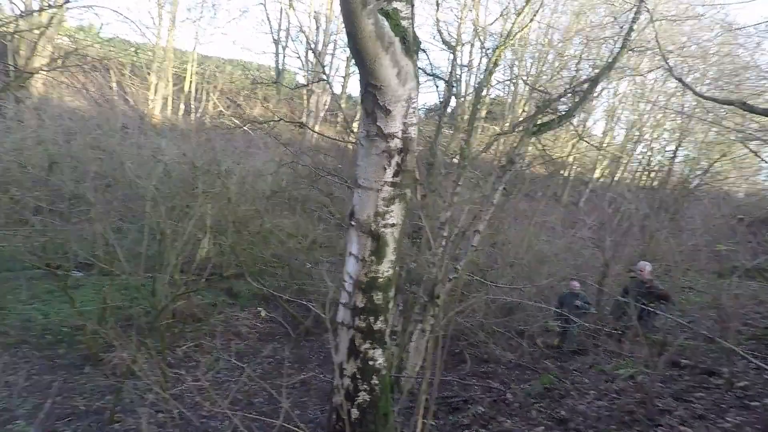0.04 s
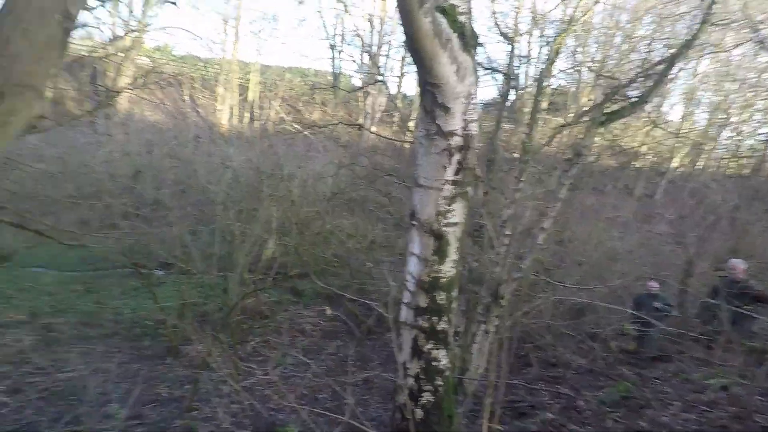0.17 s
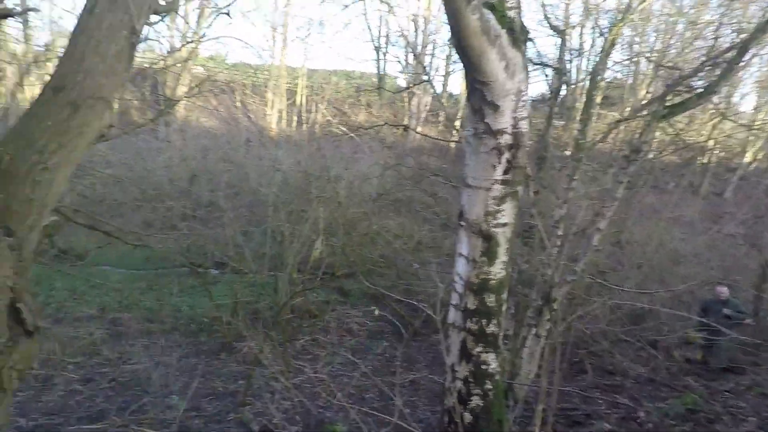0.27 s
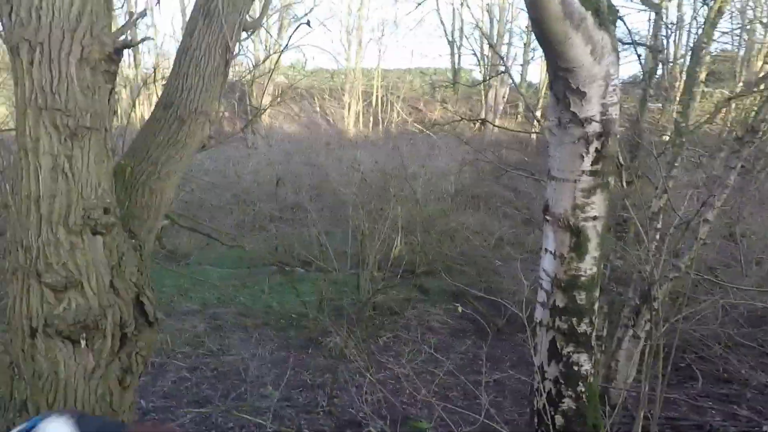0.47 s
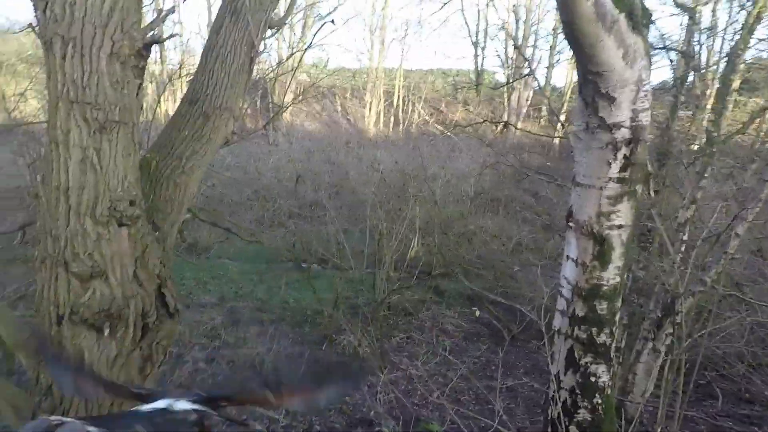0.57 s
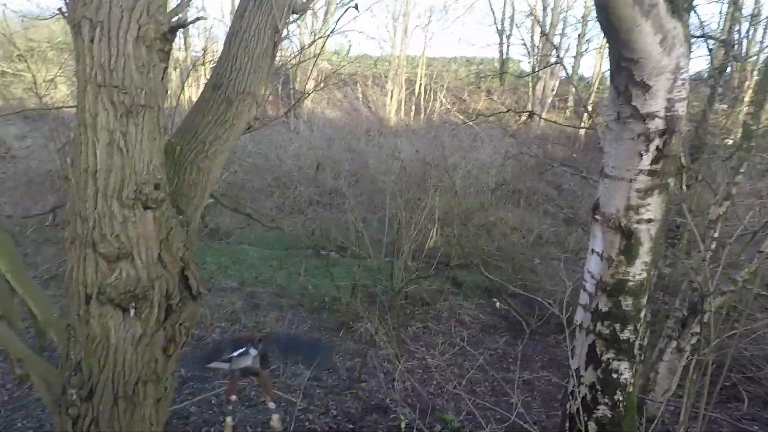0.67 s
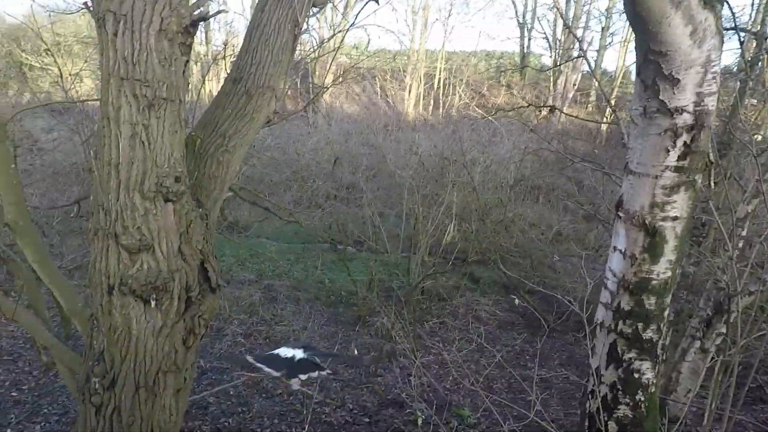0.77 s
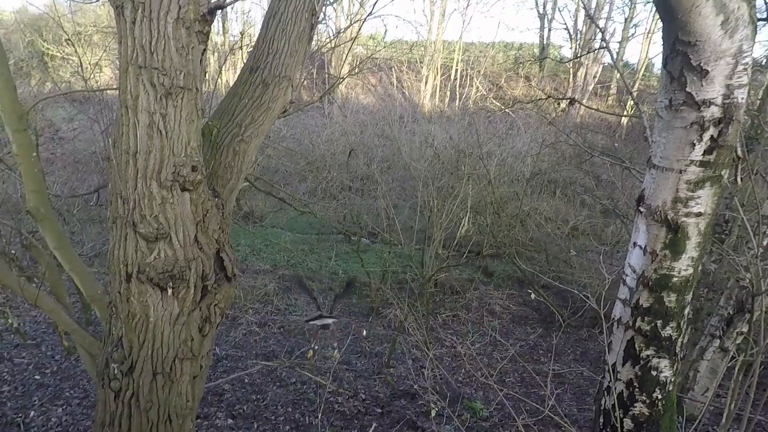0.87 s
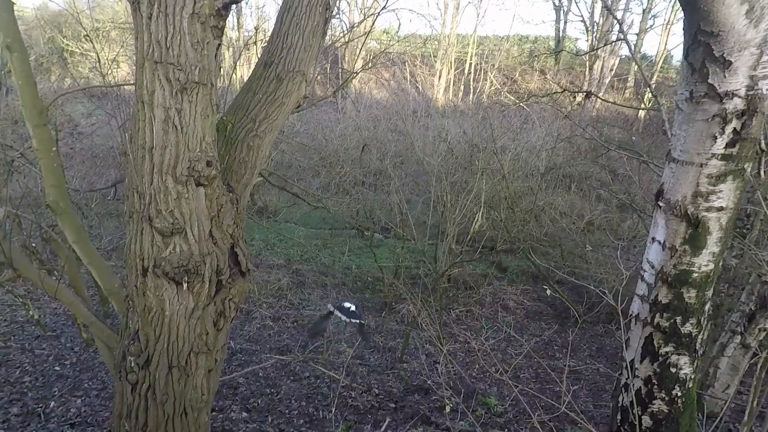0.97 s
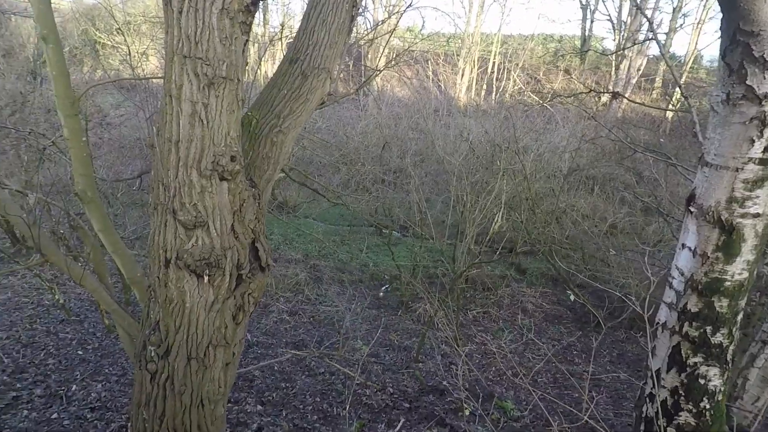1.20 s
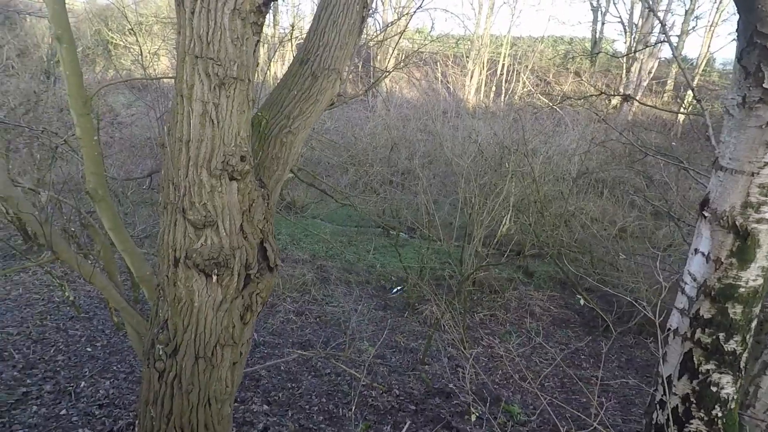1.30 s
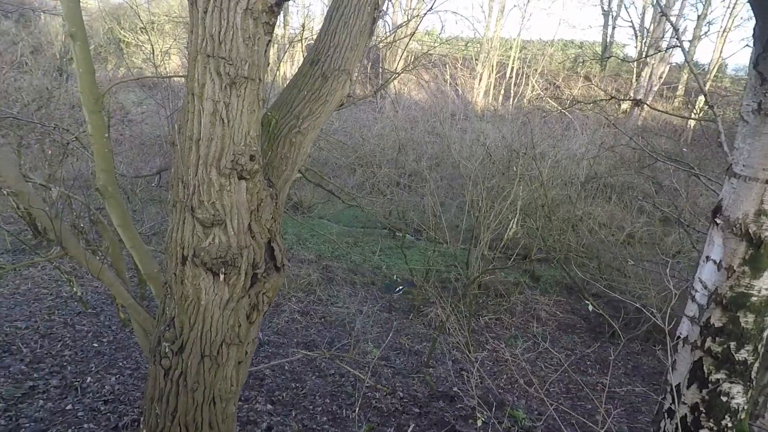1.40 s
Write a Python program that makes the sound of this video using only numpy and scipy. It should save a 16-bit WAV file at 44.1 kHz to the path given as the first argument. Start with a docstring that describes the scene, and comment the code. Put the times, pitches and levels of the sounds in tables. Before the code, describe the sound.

Small bells jingle as a bird takes off close by with a whoosh and a knock.

```python
"""A bird of prey wearing two small bells takes off beside a camera in a winter wood.
First a faint far whistle over hiss. Wings whoosh and low wind rises; near 0.25 s the push-off knocks
the camera mount, which rings, and the hiss dips. From 0.3 s the bird flaps away in puffs of air; its
bells jingle, sink slightly in pitch and echo off the trees. From 0.9 s come brief rustles and two
noisy clapper clicks, while the hiss slowly comes back and the image narrows to mono."""
import sys
import numpy as np
from scipy import signal
from scipy.fft import rfft, irfft
from scipy.io import wavfile
from scipy.ndimage import uniform_filter1d

SR = 44100
rng = np.random.default_rng(int(sys.argv[2]) if len(sys.argv) > 2 else 0)


def int16_out(signal):
    """Quantize to a 16-bit WAV file."""
    q = np.round(np.clip(np.atleast_2d(signal).T, -1, 1) * 32767)
    wavfile.write(sys.argv[1], SR, q.astype(np.int16))


N = 63945
T = np.arange(N) / SR

# Stereo likeness of noises. Each row: frequency in Hz, left-right correlation.
NOISE_CORRELATION = [(60, 0), (200, 0.23), (350, 0.1), (700, -0.43), (1400, -0.56), (2500, 0.07),
                     (16000, -0.4)]
# Share of the bells sent to the trees. Each row: time in seconds, gain in dB.
ECHO_SEND = [(.3, -24), (.75, -9), (1.0, -12.5), (1.45, -9.5)]


def amp(db):
    """Decibels to gain."""
    return 10 ** (np.asarray(db) / 20)


def unit_rms(x):
    """Scales to rms 1."""
    return x / np.sqrt(np.mean(x ** 2) + 1e-20)


def envelope(points):
    """Gain per sample from rows of seconds, dB."""
    return amp(np.interp(T, *np.transpose(points)))


def log_interp(points, hz):
    """Interpolates rows of Hz, value over log frequency."""
    f, value = np.transpose(points)
    return np.interp(np.log(hz + 1), np.log(f + 1), value)


def add(mix, start_s, sound):
    """Mixes a sound in at start_s."""
    part = mix[:, round(start_s * SR):][:, :sound.shape[-1]]
    part += sound[..., :part.shape[1]]


def noise(spectrum, correlation):
    """Stereo noise at rms 1 with the given colour and left-right correlation."""
    hz = np.fft.rfftfreq(N, 1 / SR)
    left, other = rfft(rng.standard_normal((2, N)))
    c = np.clip(log_interp(correlation, hz) if np.ndim(correlation) else correlation, -1, 1)
    right = c * left + np.sqrt(1 - c ** 2) * other
    return unit_rms(irfft(np.array([left, right]) * amp(log_interp(spectrum, hz)), N))


def flicker(rms_db=2.35, smooth_s=0.018):
    """Quick random changes of gain."""
    return amp(rms_db * unit_rms(uniform_filter1d(rng.standard_normal(N), int(smooth_s * SR))))


def bursts(times_s, levels_db, decay_s):
    """Envelope of sudden onsets with exponential decay."""
    kicks = np.zeros(N)
    kicks[np.round(times_s * SR).astype(int) % N] = amp(levels_db)
    return signal.lfilter([1], [1, -np.exp(-1 / (decay_s * SR))], kicks + 1e-12)


def whistle():
    """A thin wavering note far off, like a small songbird."""
    # Each row: time in seconds, pitch in Hz, level in dB.
    contour = [(0, 7300, -66), (.04, 7150, -55), (.08, 6750, -60), (.125, 6550, -58), (0.166, 7150, -58),
               (.185, 7100, -75)]
    times_s, hz, db = np.transpose(contour)
    waver_hz = 35 * unit_rms(uniform_filter1d(rng.standard_normal((2, N)), size=130))
    phase = 2 * np.pi * np.cumsum(np.interp(T, times_s, hz) + waver_hz, axis=1) / SR
    return amp(np.interp(T, times_s, db, right=-140)) * np.sin(phase)


def wind_and_hiss():
    """Wind on the microphone; background hiss dips after the thump, then slowly comes back."""
    # Spectra. Each row: frequency in Hz, relative level in dB.
    wind_spectrum = [(10, -10), (27, 0.5), (45, -1), (75, -5.5), (110, -17), (200, -25), (500, -40.5),
                     (16000, -100)]
    early_spectrum = [(30, -36), (100, -53), (130, -7), (160, 1.5), (220, -5), (700, -12), (1100, -14),
                      (2400, -25), (3800, -29.5), (5700, -30.5), (7200, -23.5), (9000, -27.5),
                      (12600, -35.5), (16000, -48)]
    late_spectrum = [(40, 0.5), (150, -0.5), (300, -3.5), (700, -8), (1500, -15.5), (3500, -15),
                     (5000, -19), (7500, -21.5), (10000, -24), (14000, -31.5), (16000, -40)]
    # Envelopes. Each row: time in seconds, level in dB.
    wind_levels = [(0, -86), (.2, -68), (.27, -34.5), (.5, -43), (.65, -39.5), (.88, -40), (1.0, -56.5),
                   (1.1, -48), (1.2, -37), (1.45, -35)]
    early_levels = [(0, -48), (.2, -46.5), (.27, -57), (.3, -72)]
    late_levels = [(.25, -90), (.35, -69.5), (.55, -58), (.83, -62), (.9, -55.5), (1.02, -52), (1.3, -53.5),
                   (1.38, -50), (1.45, -50)]
    wind = noise(wind_spectrum, correlation=0.18) * envelope(wind_levels)
    early_hiss = noise(early_spectrum, NOISE_CORRELATION) * envelope(early_levels)
    late_hiss = noise(late_spectrum, correlation=0.46) * envelope(late_levels) * flicker()
    return wind + early_hiss + late_hiss


def whoosh():
    """Feathers sweep the air in a swell up to the push-off."""
    # Each row: frequency in Hz, relative level in dB.
    spectrum = [(30, -27.5), (90, -44), (140, -2.5), (220, 0.5), (600, -7.5), (1300, -12.5), (2100, -22),
                (4000, -26.5), (7700, -24), (10500, -36), (14000, -65), (16000, -73)]
    # Each row: time in seconds, level in dB.
    levels = [(.14, -59), (.18, -38.5), (.2, -38), (.215, -26.5), (.24, -22.5), (.268, -25.5), (.28, -36.5),
              (.295, -62.5), (.32, -87)]
    return noise(spectrum, NOISE_CORRELATION) * envelope(levels) * flicker()


def mount_knocks():
    """The push-off scrapes and knocks the camera mount, ringing its modes."""
    # Each row: frequency in Hz, gain in dB, T60 in seconds, left phase lead in radians.
    modes = [(125, -15.5, 0.123, 1.6), (148.5, 4, 0.13, 1.25), (215, -7.5, 0.078, 1.37),
             (512, -7, 0.032, 2.25), (596, -1, 0.029, 2.2), (680, -8, 0.021, 3.1), (1510, -25, 0.019, 3.6)]
    # Each row: start in seconds, then levels in dB of low modes, high modes, scrape.
    knocks = [(.171, -46, -31.5, -31.5), (.203, -32, -32, -37), (0.243, -9.5, -16, -23),
              (0.2574, -7, 0.5, -44), (.2600, -23.5, -8, -15.5), (0.2611, -12.5, -9, -7.5),
              (.2672, -28.5, -2.5, -16)]
    # Each row: frequency in Hz, relative level in dB.
    scrape_spectrum = [(100, -26), (500, -6), (1500, 6), (3000, -6), (5000, -13.5), (7500, -7.5),
                       (10000, -27), (12000, -55), (15000, -45)]
    split_hz, rise_cycles = 350, 0.33
    out, t = np.zeros((2, N)), T[:SR // 4]
    for start_s, low_db, high_db, _ in knocks:
        for hz, db, t60_s, lead_rad in modes:
            knock_db = low_db if hz < split_hz else high_db
            decay = amp(db + knock_db - 60 * t / t60_s)
            rise = 1 - np.exp(-(t * hz / rise_cycles) ** 2)
            add(out, start_s, decay * rise * np.sin(2 * np.pi * hz * t - np.array([[0], [lead_rad]])))
    times_s, _, _, scrape_db = np.transpose(knocks)
    return out + noise(scrape_spectrum, NOISE_CORRELATION) * bursts(times_s, scrape_db, decay_s=0.0017)


def with_rebounds(strikes, mean_delay_s=0.010, mean_drop_db=13):
    """The clapper falls back more weakly after each strike; returns the columns, rebounds included."""
    first = np.array(strikes)
    delay, drop = 0.5 + rng.random((len(first), 2)).T
    times_s = first[:, 0] + mean_delay_s * delay
    levels_db = first[:, 1:] - mean_drop_db * drop[:, None]
    return np.vstack([first, np.column_stack([times_s, levels_db])]).T


def bell_mode(times_s, levels_db, hz, t60_s):
    """One shell mode; each strike lands on a different spot and the swing detunes it a little."""
    # Doppler shift in flight. Each row: strike time in seconds, pitch ratio.
    doppler = [(.3, 1.014), (.45, 1.011), (.6, 1.007), (.72, 1.0), (.9, .996), (1.4, .992)]
    rise_s, swing_hz, spread_db = 0.0013, 15.1, 2.0
    out, t = np.zeros((1, N)), T[:SR // 4]
    shape = amp(-60 * t / t60_s) * (1 - np.exp(-t / rise_s))
    for start_s, db in zip(times_s, levels_db):
        force, phase, swing = rng.standard_normal(3)
        pitch_hz = hz * np.interp(start_s, *np.transpose(doppler)) + swing_hz * swing
        tone = np.sin(2 * np.pi * (pitch_hz * t + phase))
        add(out, start_s, amp(db + spread_db * force) * shape * tone)
    return out


def bells():
    """Loose clappers click against two small shells and set them ringing."""
    # First bell. Each row: frequency in Hz, gain in dB, T60 in seconds,
    # mode family (rounded and clipped to 0-3), left minus right in dB.
    modes_one = [(2138, -4, 0.14, 0, -5), (2177, -2, 0.13, 0, 4.5), (2253, -2, 0.05, 0, 8.5),
                 (2398, -12.5, 0.039, -1, 12.5), (2084, -5, 0.031, -1, 11.5), (5000, -4, 0.21, 1, 2.5),
                 (5744, 2.5, 0.094, 2.5, 5.5), (5930, -15.5, 0.14, 19, -16), (8930, -9.5, 0.068, 3, -20),
                 (8976, -3, 0.15, 3, -12.5), (9150, -6, 0.044, 3, -2), (10620, -13.5, 0.1, 3, -8),
                 (13330, -29, 0.12, 3, 10), (14550, -15, 0.088, 3, -21), (14760, -26, .07, 3, -1)]
    # Its clapper. Each row: start in seconds, then drive in dB of the 2.2 kHz, 5 kHz,
    # 5.8 kHz and top families and of the click.
    strikes_one = [(0.303, -58, -78, -89, -79, -77), (.320, -52, -86.5, -84, -76, -77),
                   (.331, -48, -69, -75, -73, -72), (.366, -87, -72, -72, -61, -75),
                   (.381, -50.5, -70, -77, -58, -64), (.394, -50.5, -59, -72, -79, -52),
                   (.4076, -43, -57, -68, -52.5, -54), (.430, -67, -56, -60, -86, -74),
                   (.452, -45.5, -59, -58, -84, -72), (.4895, -30.5, -49, -45.5, -54, -44),
                   (.508, -38, -59, -71, -61, -50), (.517, -58, -71, -37.5, -49, -44),
                   (.528, -35, -65, -42.5, -48, -59), (.541, -40.5, -71, -58, -61, -55),
                   (.557, -33, -52, -40.5, -46, -39.5), (.570, -39.5, -38.5, -71, -50.5, -39),
                   (.586, -40, -44, -62, -75, -63), (.607, -40, -45, -57, -49.5, -52),
                   (.623, -50, -44.5, -62, -58, -51), (.678, -34, -63, -44, -42.5, -43),
                   (.696, -34, -40, -48.5, -42, -52), (.720, -40, -46, -52.5, -52, -57),
                   (.7373, -33, -59, -52, -67, -37.5), (.747, -61, -49.5, -63, -60, -61),
                   (.7628, -41, -51, -50, -55, -59), (.7812, -57, -51, -70, -55, -69),
                   (.836, -50.5, -81, -79, -80, -67), (.867, -48, -68.5, -59, -67, -59),
                   (.897, -67, -65, -68, -58, -43), (.9059, -40.5, -55, -45, -50, -33.5),
                   (.926, -53, -65, -55, -52, -51), (.952, -45, -73, -48, -64, -54),
                   (.961, -39, -73, -53, -49, -47), (.977, -48, -77, -60, -57, -61),
                   (1.002, -47, -70, -63, -58.5, -41), (1.030, -51, -59, -59, -69, -46),
                   (1.0586, -39, -71, -53, -57, -40.5), (1.095, -43.5, -72, -62, -66, -46),
                   (1.123, -55, -70, -63, -69, -40), (1.144, -43, -66, -71, -53, -60),
                   (1.160, -44.5, -76, -63, -60, -59), (1.195, -48.5, -60, -62, -60, -62),
                   (1.2237, -40.5, -69, -65, -64, -42.5), (1.2696, -43, -72, -65, -58, -56),
                   (1.2861, -40.5, -77, -62, -56.5, -61), (1.3215, -39, -79, -56, -74, -41),
                   (1.345, -45.5, -85, -73, -76, -56), (1.3769, -45.5, -77, -74, -78, -68),
                   (1.3938, -37.5, -72, -48, -54, -56), (1.420, -49.5, -75, -54, -65, -39),
                   (1.437, -44, -76, -70, -58, -41)]
    # Second bell. Each row: frequency in Hz, gain in dB, T60 in seconds.
    modes_two = [(3192, -14.5, 0.54), (3772, -2, 0.11), (3880, -9.5, 0.072), (3970, -14, 0.14),
                 (6820, -19, 0.21), (7300, -34, 0.096), (7300, -42, 0.11), (12904, -36, 0.16),
                 (14300, -44, 0.16)]
    # Its clapper. Each row: start in seconds, drive in dB.
    strikes_two = [(0.816, -43.5), (.874, -73), (0.883, -51), (0.923, -47.5), (1.014, -62), (1.045, -46.5),
                   (1.060, -60), (1.088, -54), (1.107, -45), (1.130, -50), (1.166, -45), (1.205, -43.5),
                   (1.235, -44), (1.263, -42.5), (1.285, -50), (1.364, -50.5), (1.406, -52)]
    # Each row: frequency in Hz, relative level in dB.
    click_spectrum = [(300, -28), (1200, -36), (1800, -26), (2280, 14), (3000, -12), (4200, -9),
                      (6500, -1.5), (10000, -15.5), (11800, -39), (13300, -18), (14000, -29), (14700, -10),
                      (16000, -32)]
    click_decay_s = 0.0047
    one_s, *family_db, click_db = with_rebounds(strikes_one)
    two_s, two_db = with_rebounds(strikes_two)
    one = 0
    for hz, db, t60_s, family, pan_db in modes_one:
        drive_db = family_db[int(np.clip(round(family), 0, 3))]
        one += amp([[pan_db / 2], [-pan_db / 2]]) * bell_mode(one_s, drive_db + db, hz, t60_s)
    two = sum(bell_mode(two_s, two_db + db, hz, t60_s) for hz, db, t60_s in modes_two)
    impacts = bursts(one_s, click_db, click_decay_s) + bursts(two_s, two_db - 3, click_decay_s)
    clicks = amp(-4) * noise(click_spectrum, correlation=0.36) * impacts
    return one + two + clicks


def among_trees(source):
    """Direct sound yields to scattered echoes from trunks as the bird recedes."""
    t60_s, predelay_s, tap_density = 0.23, 0.008, 0.05
    t, send = T[:SR // 2], envelope(ECHO_SEND)
    taps = rng.standard_normal((2, len(t))) * (rng.random((2, len(t))) < tap_density)
    taps *= (t > predelay_s) * amp(-60 * t / t60_s)
    echoes = signal.fftconvolve(source * send, taps / np.linalg.norm(taps[0]), axes=1)[:, :N]
    return source * (1 - 0.74 * send) + echoes


def wingbeats():
    """Each beat throws a low puff of air, turbulence and a rustle of feathers."""
    # Each row: centre in seconds, half length in seconds, air level in dB, puff pitch in Hz,
    # feather level in dB.
    beats = [(0.316, 0.031, -40, 209.3, -84), (.372, .012, -38.5, 200, -85),
             (0.395, 0.011, -33.5, 160, -54.5), (0.43, 0.027, -44.5, 101, -64),
             (.482, 0.018, -46, 195, -54), (.552, 0.028, -41.5, 168, -55), (.589, 0.004, -27.5, 256, -49.5),
             (0.599, 0.016, -46, 283, -52.5), (0.631, 0.021, -36.5, 118, -54.5),
             (.674, 0.018, -37, 179, -70), (0.733, 0.023, -59.5, 180, -56.5)]
    # Spectra. Each row: frequency in Hz, relative level in dB.
    air_spectrum = [(30, -20), (70, -4.5), (130, 2.5), (190, -1), (280, -4), (400, -22), (900, -40),
                    (16000, -100)]
    feather_spectrum = [(100, -7), (400, 8), (1000, -4.5), (3000, -15.5), (7000, -13.5), (10000, -41),
                        (12000, -44), (16000, -50)]
    puffs = air_gain = feather_gain = 0
    for centre_s, half_s, air_db, hz, feather_db in beats:
        t = T - centre_s
        swell = np.exp(-(t / half_s) ** 2)
        puffs += amp(air_db + 0.5) * swell * np.sin(2 * np.pi * hz * t)
        air_gain += amp(air_db - 0.5) * swell
        feather_gain += amp(feather_db) * swell
    turbulence = noise(air_spectrum, correlation=0) * air_gain
    feathers = noise(feather_spectrum, correlation=0.23) * feather_gain * flicker()
    return puffs + turbulence + feathers


def rustles_and_clicks():
    """Short grainy rustles, and noisy clicks near 2 kHz as the clapper strikes the bell."""
    # Each row: centre in seconds, half length in seconds, level in dB, band centre in Hz.
    # The clicks are at 0.905 s and 1.225 s; the rest are twigs and dry leaves.
    events = [(0.885, 0.008, -51.5, 3860), (0.905, 0.0035, -40, 2010), (0.939, 0.0041, -59, 880),
              (1.012, 0.0083, -53.5, 1620), (1.015, 0.0092, -57, 4600), (1.052, 0.0092, -55, 3380),
              (1.09, 0.014, -50.5, 3660), (1.169, 0.002, -46, 3880), (1.168, 0.0041, -51, 740),
              (1.225, 0.005, -46.5, 2370), (1.235, 0.0075, -62, 2830), (1.356, 0.0064, -55, 1220),
              (1.389, 0.023, -57.5, 1500), (1.427, .025, -61, 1630)]
    size, half_width_octaves = 8192, 0.12
    hz, out = np.fft.rfftfreq(size, 1 / SR), np.zeros((2, N))
    t = (np.arange(size) - size // 2) / SR
    for centre_s, half_s, db, centre_hz in events:
        grains = rng.standard_normal(size) ** 3  # cubed for sparse spikes
        band = 1 / (1 + (np.log2((hz + 1) / centre_hz) / half_width_octaves) ** 2)
        band_noise = unit_rms(irfft(rfft(grains) * band))
        add(out, centre_s + t[0], amp(db) * band_noise * np.exp(-(t / half_s) ** 2))
    return out


def scene():
    """The bird and the wood around it."""
    jingle = among_trees(bells())
    low_cut = signal.butter(3, 113, "high", fs=SR, output="sos")  # the take-off sounds carry no deep bass
    take_off = signal.sosfilt(low_cut, whoosh() + mount_knocks())
    return jingle + take_off + wingbeats() + rustles_and_clicks() + whistle() + wind_and_hiss()


def record(dry):
    """Narrows the image to mono, soft-clips the loudest knock and cuts the top."""
    # Each row: time in seconds, stereo width from 0 to 1.
    widths = [(0, 0.88), (.45, 1), (.62, 0.58), (.8, 0.28), (.92, 0.14), (1.45, 0)]
    ceiling, cutoff_hz = 0.98, 15300
    mid = dry.mean(0)
    narrowed = mid + (dry - mid) * np.interp(T, *np.transpose(widths))
    clipped = narrowed / (1 + (narrowed / ceiling) ** 4) ** 0.25
    low_pass = signal.firwin(255, cutoff_hz, window=("kaiser", 9), fs=SR)
    return signal.oaconvolve(clipped, low_pass[None], "same")


dry = scene()
out = record(dry)
int16_out(out)
```